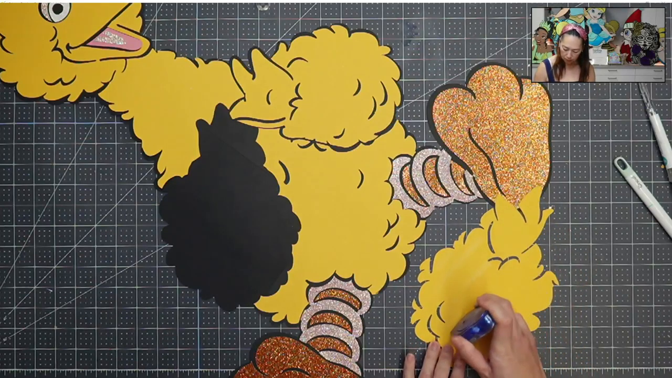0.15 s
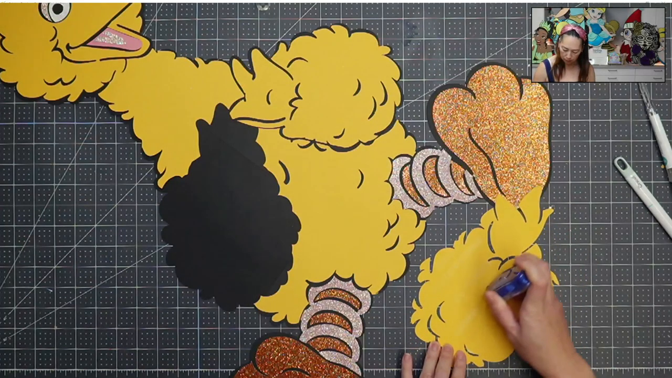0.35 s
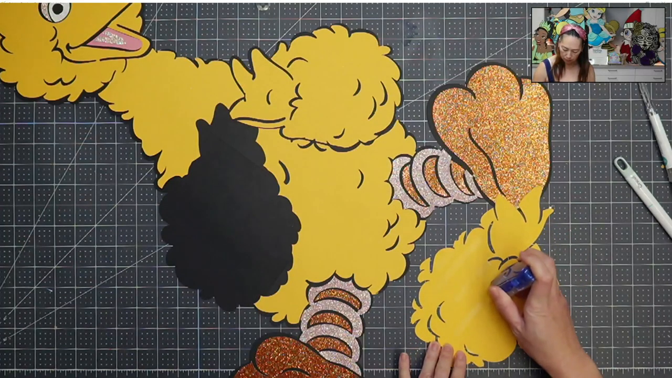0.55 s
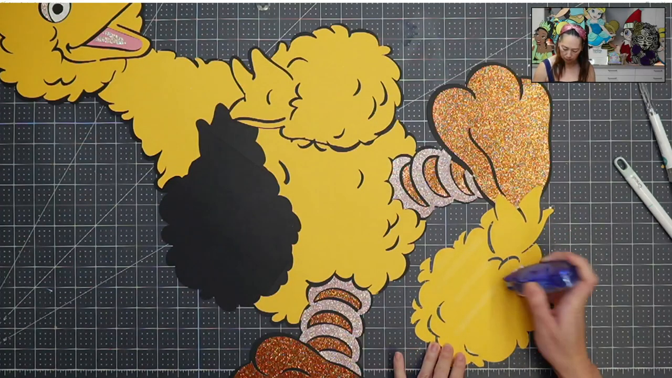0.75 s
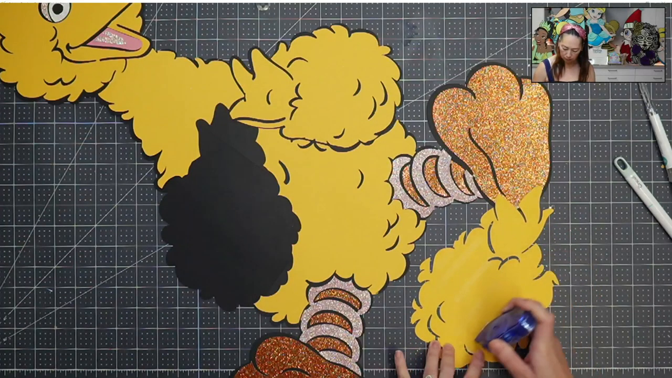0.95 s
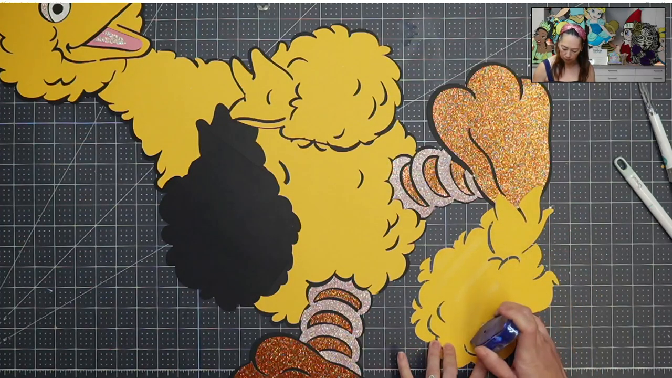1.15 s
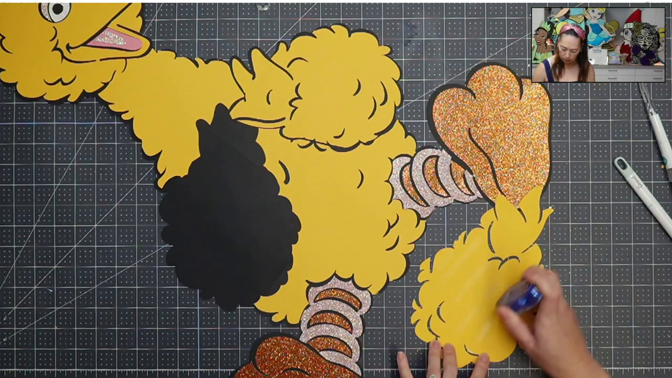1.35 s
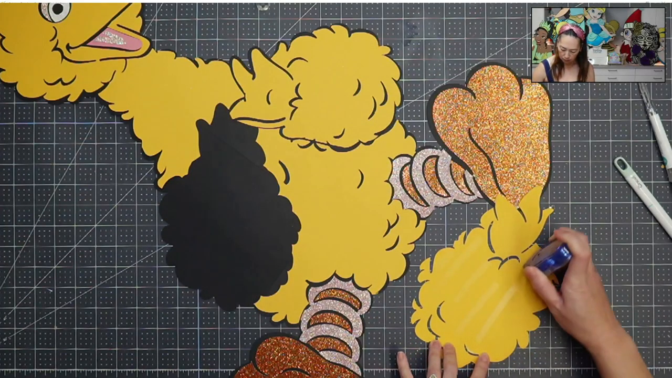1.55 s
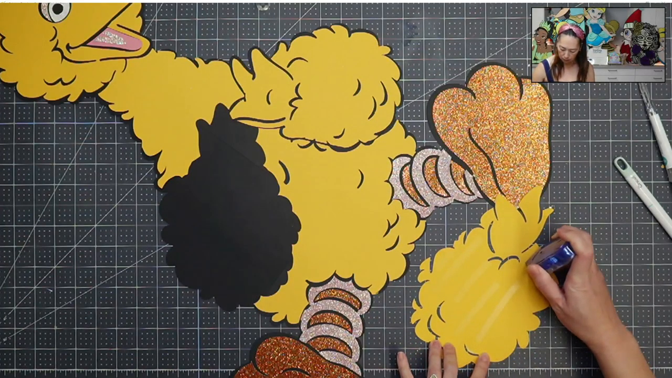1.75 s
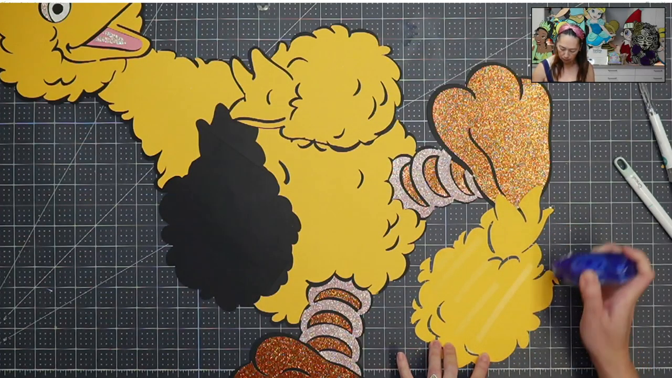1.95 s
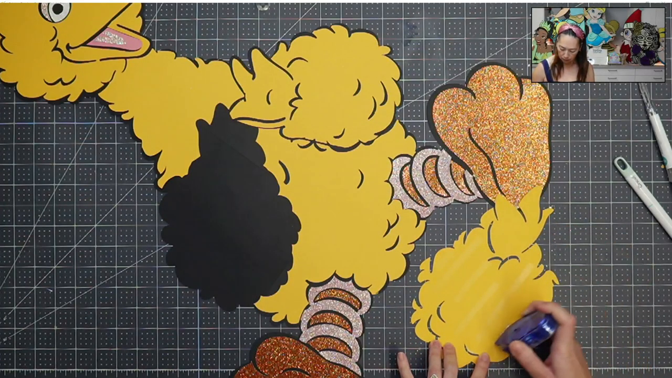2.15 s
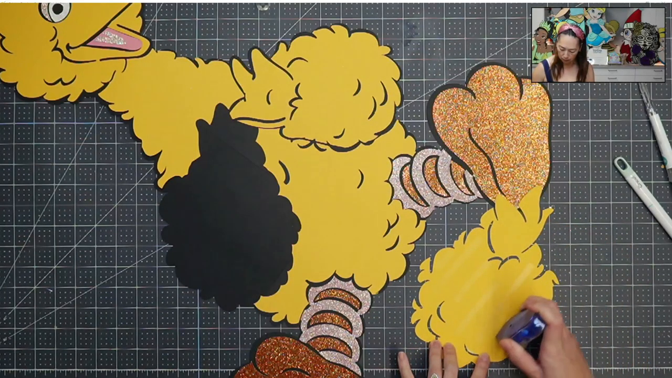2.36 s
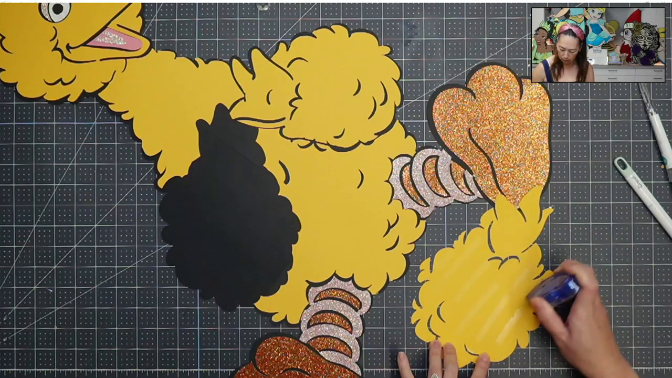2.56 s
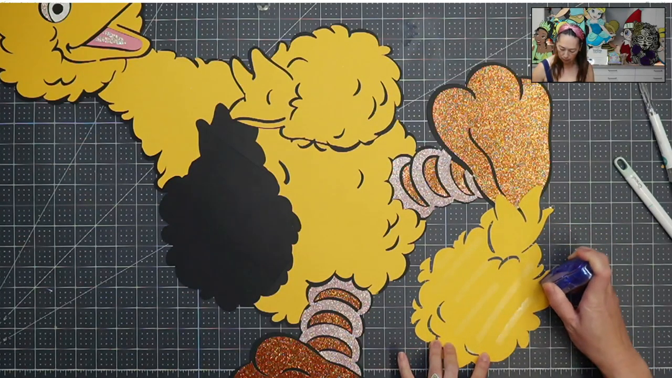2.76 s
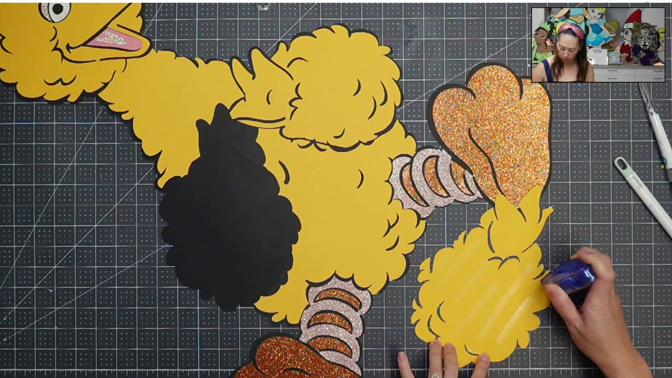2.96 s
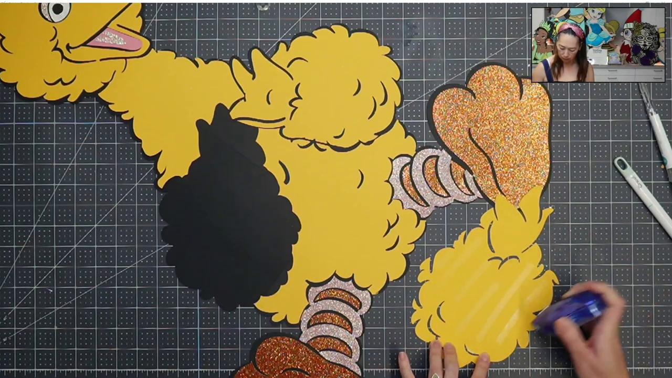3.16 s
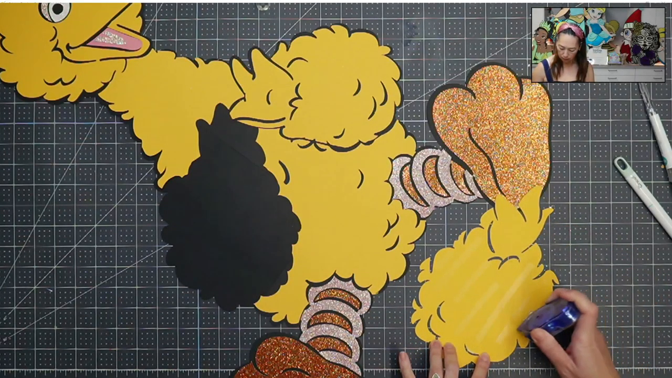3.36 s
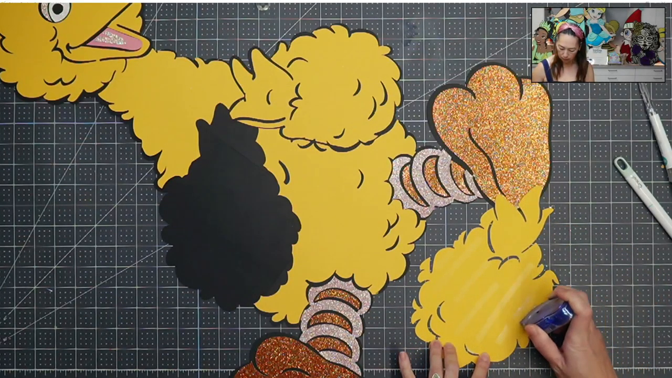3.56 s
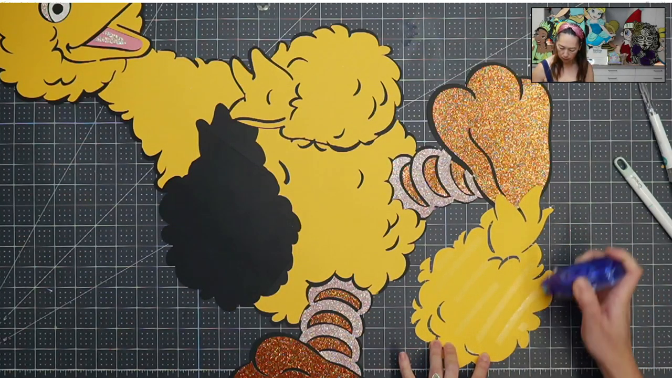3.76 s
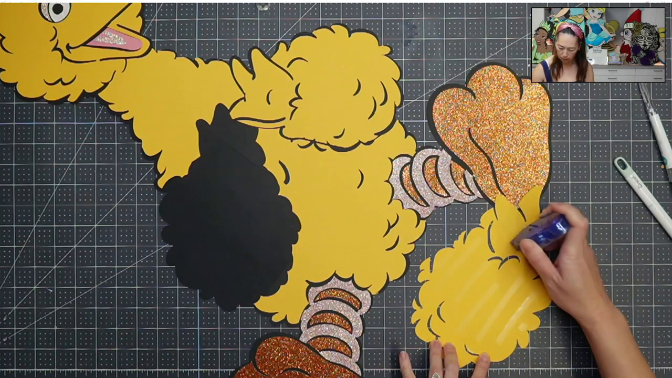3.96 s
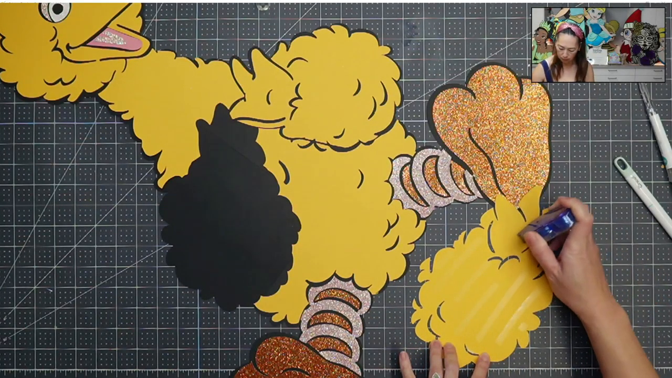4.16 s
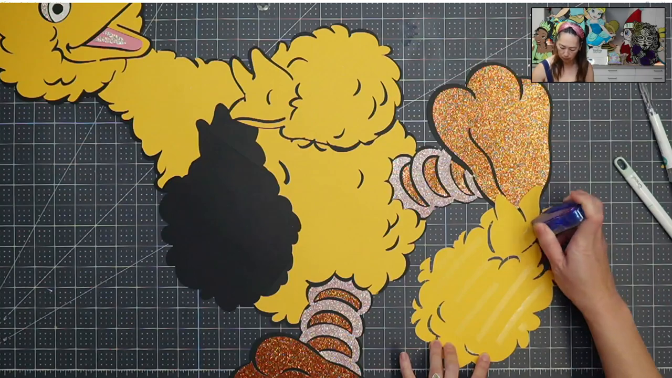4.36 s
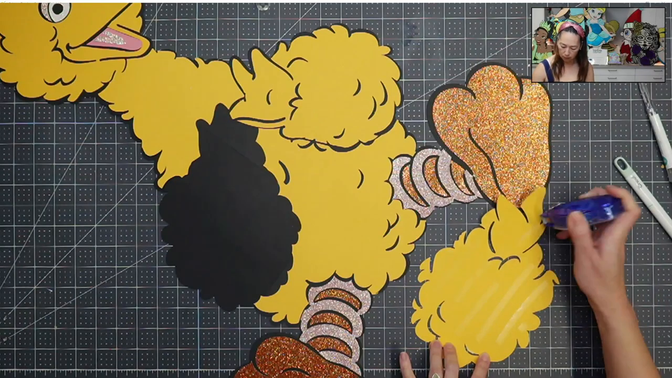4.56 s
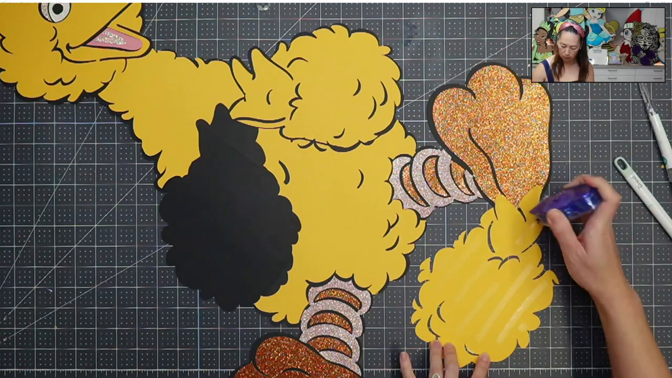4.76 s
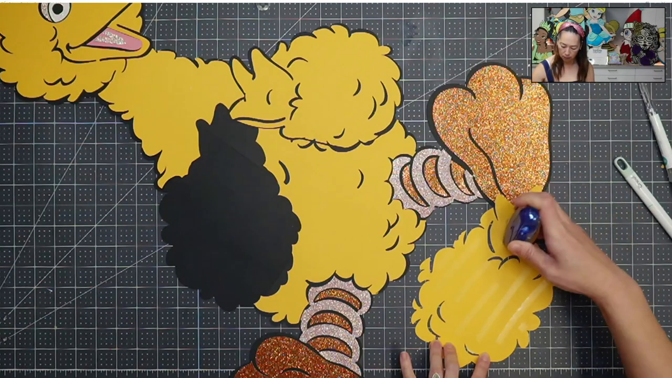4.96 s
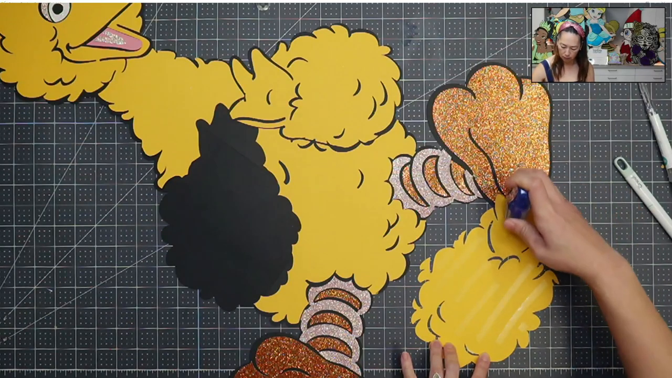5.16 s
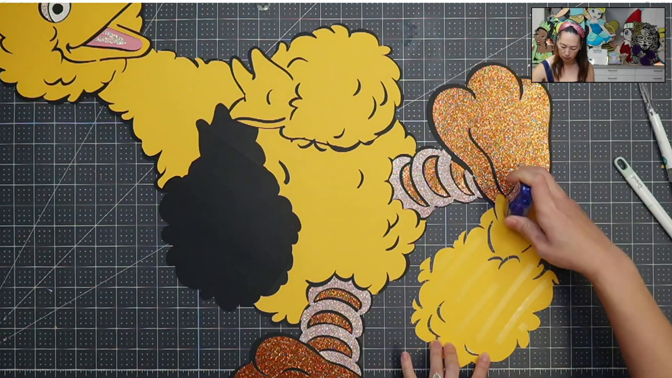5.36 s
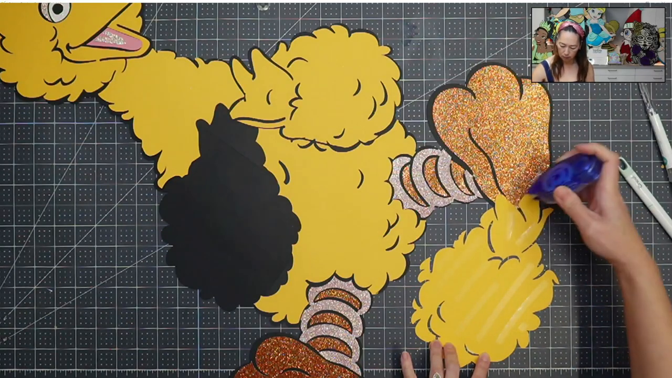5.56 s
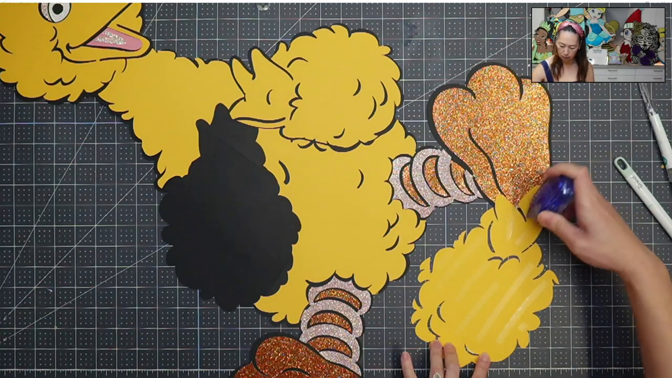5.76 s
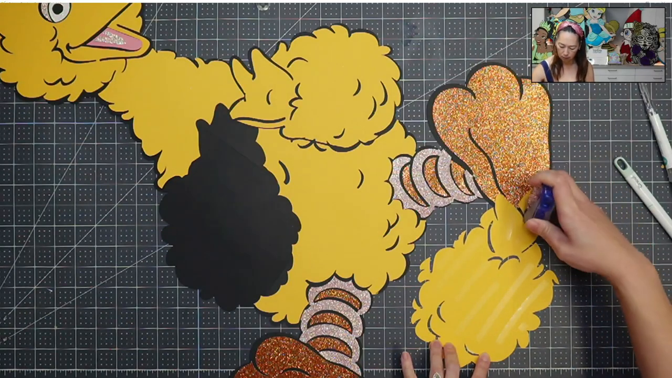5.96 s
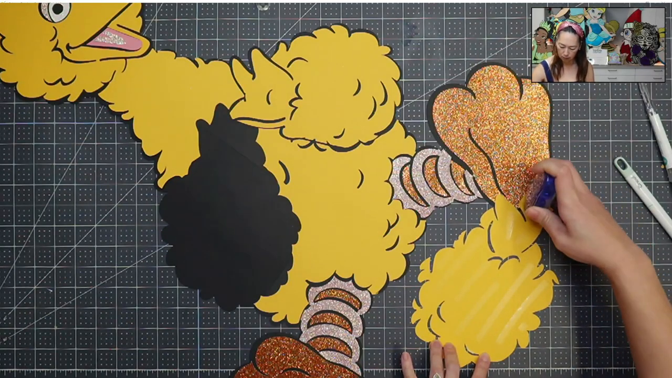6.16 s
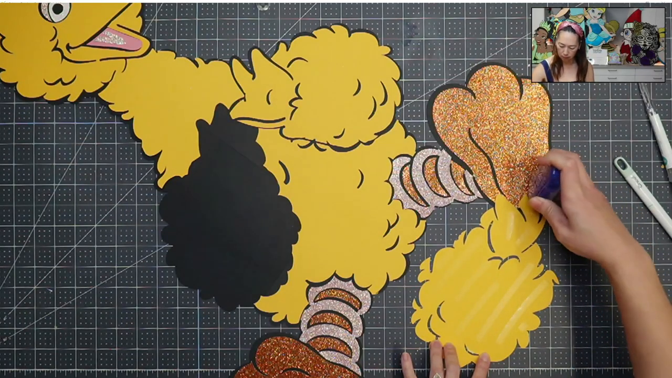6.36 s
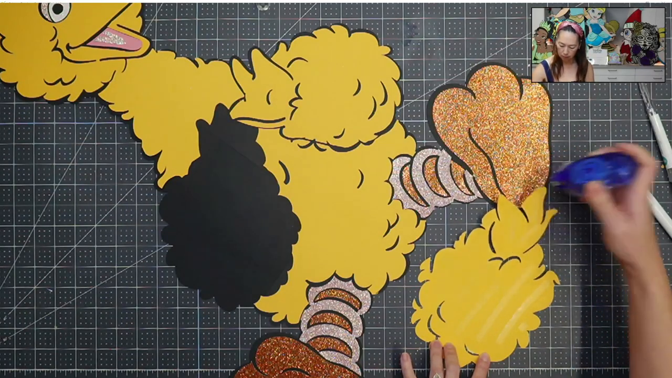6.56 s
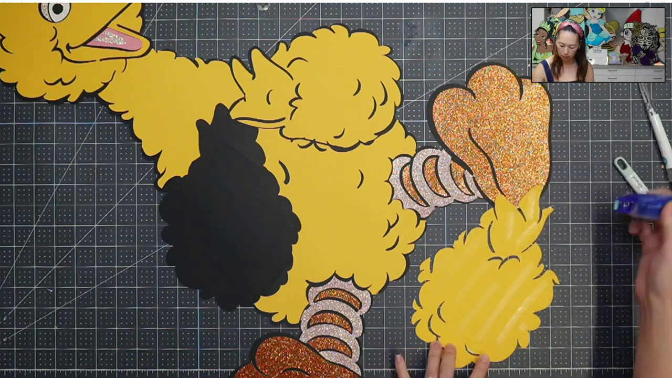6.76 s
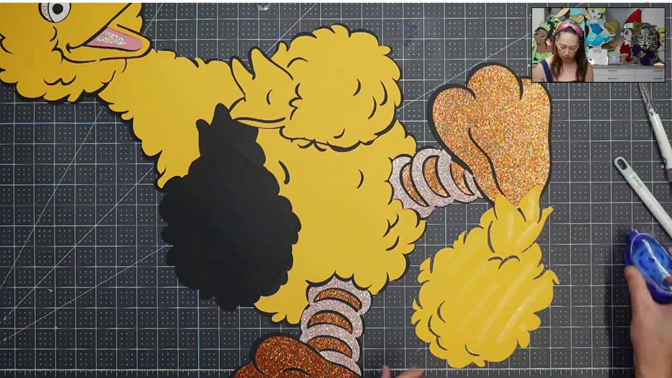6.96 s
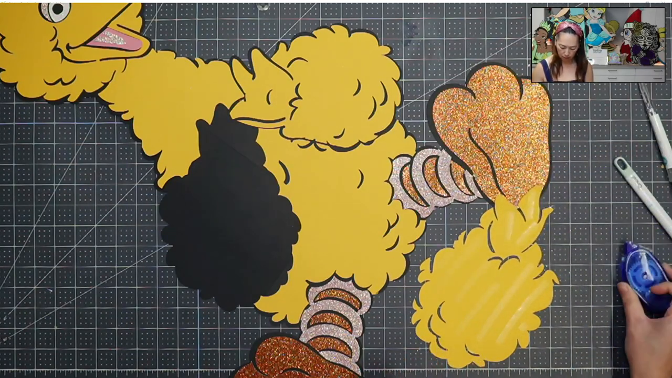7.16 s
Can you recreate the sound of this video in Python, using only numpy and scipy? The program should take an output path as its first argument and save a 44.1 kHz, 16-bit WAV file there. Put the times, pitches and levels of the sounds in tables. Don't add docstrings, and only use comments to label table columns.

```python
import sys
import numpy as np
from scipy import signal
from scipy.io import wavfile
from scipy.ndimage import uniform_filter1d

SR = 44100
rng = np.random.default_rng(int(sys.argv[2]) if len(sys.argv) > 2 else 0)


def to_wav(sig):
    pcm = np.clip(np.atleast_2d(sig), -1, 1) * 32767
    pcm = np.round(pcm).astype(np.int16)
    wavfile.write(sys.argv[1], SR, pcm.T)


def boost(x):
    u = np.asarray(x, float) / 20
    return 10 ** u


N = 318402


def evened(x):
    return x / np.sqrt(np.mean(x ** 2, axis=-1, keepdims=True) + 1e-20)


def read(points, hz):
    f, value = np.transpose(points)
    return np.interp(np.log(hz + 1), np.log(f + 1), value)


def add(mix, s, sound):
    part = mix[max(round(s * SR), 0):][:len(sound)]
    part += sound[:len(part)]


# (frequency [Hz], level [dB per Hz])
AIR = [(12, -44), (22, -10.5), (45, -9), (70, -3.5), (134, -9.5), (250, -18.5), (328, -16.5), (410, -20.5),
       (574, -21.5), (1150, -26.5), (1480, -27.5), (2320, -30), (3250, -30.5), (4670, -34), (16000, -34.5)]
# (frequency [Hz], likeness [0-1])
AIR_LIKENESS = [(60, 0.96), (180, 0.95), (550, 0.75), (1650, 0.74), (4970, 0.4), (7600, 0.057),
                (8100, 0.98), (15000, 0.95)]
# (frequency [Hz], width [Hz], level [dB])
FAN = (3230, 130, -87.5)


def air(air_db=-64.5):
    frames = N // 512 + 5
    hz = np.fft.rfftfreq(2048, 1 / SR)
    a, b, c, d = rng.standard_normal((frames, 1025, 4)).T
    centre = a + 1j * b
    likeness = np.clip(read(AIR_LIKENESS, hz), 0, 1)
    side = np.sqrt((1 - likeness) / 2)[:, None] * (c + 1j * d)
    hiss = np.array([centre + side, centre - side]) * boost(read(AIR, hz))[:, None]
    fan_hz, fan_width, fan_db = FAN
    whine = centre * np.exp(-((hz - fan_hz) / fan_width) ** 2)[:, None]
    hiss = signal.istft(hiss, nperseg=2048, noverlap=1536)[1][..., :N]
    whine = signal.istft(whine, nperseg=2048, noverlap=1536)[1][..., :N]
    return boost(air_db) * evened(hiss) + boost(fan_db) * evened(whine)


def ring(modes, stretch, size=1024):
    t = np.arange(size) / SR
    rung = 0
    for k, (hz, width, db) in enumerate(modes):
        decay = boost(db) * width * np.exp(-np.pi * width * t)
        rung = rung + (-1) ** k * decay * np.sin(2 * np.pi * hz * np.outer(stretch, t))
    lowest_hz = modes[0][0]
    return signal.sosfilt(signal.butter(2, 0.77 * lowest_hz, "high", fs=SR, output="sos"), rung)


def snaps(rows, parts, chatter_s, sag_db, fall_s, grit_db, strike, gain_db, alike, size=400):
    s, snap_db, *others_db = np.transpose(rows)
    t = np.arange(size) / SR
    fall = np.exp(-np.maximum(t - chatter_s, 0) / fall_s)
    shape = np.minimum(t / 0.000055, 1) * boost(-sag_db * t / chatter_s) * fall
    noise, grit = rng.standard_normal((len(s), size, 2)).T
    chatter = signal.lfilter([1], [1, -alike], noise * boost(grit_db * grit)).T * shape
    when, force, grip = rng.random((len(s), 3)).T
    blow_s = .0002 + when[:, None] ** 3 * chatter_s
    chatter += strike * force[:, None] * np.exp(-((t - blow_s) / .00004) ** 2)
    stretch = 1 + 0.06 * (grip - .5)
    sound = 0
    for modes, db in zip(parts, (0, *others_db)):
        rung = signal.fftconvolve(chatter, ring(modes, stretch), axes=1)
        loudest = uniform_filter1d(rung ** 2, size=110, axis=1).max(1)
        sound = sound + rung * (boost(snap_db + db + gain_db) / np.sqrt(loudest))[:, None]
    out = np.zeros(N)
    for start, one in zip(s, sound):
        add(out, start, one)
    return out


USUAL_DB = -37


def voiced(rows, kind, growth=1):
    s, db, lean = np.transpose(rows)[..., None]
    colour_db, slope = np.transpose(kind)
    parts = USUAL_DB + np.multiply(growth, db - USUAL_DB) + colour_db + slope * lean
    snap = parts[:, :1]
    return np.hstack([s, snap, parts[:, 1:] - snap])


# (level [dB], slope [dB per dB of lean])
TOOTH = [(-0.4, 0.2), (-5, .95), (0, 0.01), (-2.5, 0.1), (-33, 0.23)]
GROWTH = [1, 0.47, 0.54, 0.083, 0.55]


def tooth_rows(rows):
    return voiced(rows, TOOTH, GROWTH)


# (time [s], teeth passed [count])
WHEEL = [
    [(0.0028, 0), (0.0222, 3), (0.0666, 11), (0.1051, 17), (0.1697, 25), (0.207, 28), (0.2253, 30),
     (0.2378, 31)],
    [(1.0311, 0), (1.0439, 1), (1.0848, 6), (1.1426, 15), (1.1912, 24), (1.2506, 34), (1.3026, 41),
     (1.3207, 43), (1.3705, 47)],
    [(2.1481, 0), (2.1635, 1), (2.1946, 4), (2.2377, 9), (2.2693, 13), (2.3433, 24), (2.4038, 31),
     (2.4653, 36), (2.4997, 38)],
    [(4.8815, 0), (4.8991, 1), (4.9106, 2), (4.9671, 8), (5.0125, 13), (5.0271, 14)],
]
# (time [s], force [dB], pressure on the card [dB])
STROKES = [
    [(.003, -36, 2.5), (.022, -38, 2.5), (.067, -32.5, 1.5), (.088, -40, 6), (.108, -29, 7),
     (.125, -33.5, -0.5), (.15, -37, 7), (.2, -37.5, 1), (.238, -40.5, 0.5)],
    [(1.031, -38.5, -3.5), (1.06, -36.5, 1), (1.085, -36, 7), (1.143, -31.5, 0.5), (1.19, -36, 5),
     (1.25, -33.5, 1), (1.32, -31, 4.5), (1.37, -31, -2.5)],
    [(2.148, -37, -3.5), (2.195, -39, 4.5), (2.238, -36.5, -1), (2.27, -35, -1), (2.343, -31, 0.5),
     (2.404, -35, -1.5), (2.5, -41.5, 4.5)],
    [(4.882, -40.5, -5.5), (4.911, -38, 0.5), (4.967, -38, 1.5), (5.013, -31.5, -2), (5.027, -34, 2)],
]


def wheel(turning, pull, uneven_s=.0003, uneven_db=2.0, drift_db=1.0):
    turn_s, teeth = np.transpose(turning)
    at = np.interp(np.arange(teeth[-1] + 1), teeth, turn_s)
    s, *levels = np.transpose(tooth_rows(pull))
    rows = np.transpose([at] + [np.interp(at, s, level) for level in levels])
    drift = 2 * uniform_filter1d(rng.standard_normal(rows.shape), size=4, axis=0)
    drift *= [0, 0] + [drift_db] * (len(levels) - 1)
    uneven = rng.standard_normal(rows.shape) * ([uneven_s] + [uneven_db] * len(levels))
    return rows + drift + uneven


# (time [s], force [dB], pressure on the card [dB])
LAST_TEETH = [
    (.2571, -38.5, 5.5),
    (.4082, -40, -1.5),
    (1.172, -23, -27),
    (1.3982, -51, 3),
    (1.5429, -41, -1),
    (2.5474, -37.5, -1),
    (2.6365, -38.5, -3.5),
    (2.6989, -38.5, -7.5),
    (5.9738, -35.5, -4),
]
# (time [s], force [dB], pressure on the card
# [dB])
SLOWER_PULLS = [(3.3057, -32.5, -2.5), (3.3166, -34, 4.5), (3.327, -32, -5), (3.3474, -37, 1),
                (5.8076, -35.5, -9.5), (5.8248, -33, -0.5), (5.838, -36, 0.5), (5.8478, -34, 1),
                (5.8561, -38, 3.5), (5.8745, -35, -2), (6.0168, -29, 6), (6.0246, -36, 7), (6.0301, -27, -3),
                (6.0371, -30, -4), (6.0431, -35, 8), (6.059, -45, 2), (6.0741, -32, -20), (6.1021, -39, -3),
                (3.9231, -35, 1), (3.9374, -36, 4.5), (3.9474, -32.5, 0), (3.9571, -31, -18), (3.9716, -39, 3),
             (3.994, -34, -6), (4.0207, -40.5, 7), (4.0479, -28.5, 2), (4.063, -28, -5), (4.078, -33.5, 9),
             (4.096, -37, -10), (4.1176, -34, -6), (4.1472, -35, -4), (4.1803, -38, -6), (4.2078, -35, -5)]
# (frequency [Hz], width [Hz], level [dB])
SNAP = [(2170, 444, -7), (3012, 310, 0), (3265, 132, 4.5), (3610, 350, -1)]
BELLY = [(1062, 720, -13.5), (1322, 149, -4), (1493, 76, 1.5), (1735, 365, -6.5)]
RIM = [(4406, 730, -0.5), (4690, 370, 5.5), (5450, 980, -2.5), (6900, 1320, -4), (8600, 130, -5)]
SIZZLE = [(9870, 2100, -1), (10650, 340, 2.5), (12360, 1200, 3), (14950, 430, 3.5)]
# (frequency [Hz], width [Hz], level [dB])
TABLE_BASS = [(189, 71, 4), (337, 120, -4.5)]


def ratchet():
    strokes = [wheel(turning, pull) for turning, pull in zip(WHEEL, STROKES)]
    teeth = np.vstack(strokes + [tooth_rows(LAST_TEETH + SLOWER_PULLS)])
    return snaps(teeth, [SNAP, BELLY, RIM, SIZZLE, TABLE_BASS], chatter_s=.0026, sag_db=5, fall_s=.0005,
                 grit_db=4.5, strike=10, gain_db=-1.03, alike=0.42)


# (frequency [Hz], t60 [s])
ROOM = [(200, 0.45), (700, 0.26), (1500, 0.52), (3500, 0.48), (7000, 0.49), (14000, 0.33)]
# (frequency [Hz], level [dB])
WET = [(200, 1), (850, -4.5), (1500, -2.5), (2200, -1), (3300, -4.5), (4800, -6.5), (7000, -8.5),
       (14000, -12.5)]
# (time [s], level [dB])
WALLS = [(.0085, -41), (0.0134, -20), (0.0204, -20), (0.027, -31)]


def room(x, spread_db=-45, build_s=0.00067):
    taps = np.zeros((2, SR))
    at = np.arange(150, SR - 10, 10) + rng.integers(0, 10, (2, (SR - 151) // 10))
    np.put_along_axis(taps, at, rng.choice([-1., 1.], at.shape), 1)
    taps *= 1 - np.exp(-np.arange(SR) / SR / build_s)
    hz, t, z = signal.stft(taps, SR, nperseg=256)
    t60 = read(ROOM, hz)[:, None]
    z = z * boost(read(WET, hz)[:, None] - 60 * t / t60) / np.sqrt(t60)
    mid, side = signal.istft(z, SR, nperseg=256)[1] * np.sqrt(6 * np.log(10) * 10 / SR)
    for s, db in WALLS:
        rough = np.convolve(rng.standard_normal(20), [.5, 1, .5])
        add(mid, s, boost(db) * evened(rough) / np.sqrt(22))
    side = boost(spread_db) * side
    tails = np.array([mid + side, mid - side])
    return signal.fftconvolve(x[None], tails, axes=1)[:, :N]


# (frequency [Hz], width [Hz], level [dB])
TABLE = [(490, 400, -9), (740, 385, 0.5), (960, 210, -4)]


def shell_contact(rows):
    return snaps(rows, [SNAP, BELLY, RIM[:-1], SIZZLE, TABLE], chatter_s=.0022, sag_db=5, fall_s=.0022,
                 grit_db=2.5, strike=3.5, gain_db=0.18, alike=0)


# (time [s], level [dB], thinness [dB])
TICKS = [(.4755, -55, 14), (.4798, -47.5, 11), (.4825, -50, 11), (1.6365, -59.5, -4), (2.7627, -52, 15),
         (3.2138, -41.5, -3), (3.2895, -60, -4), (3.298, -66, -2), (4.359, -52.5, -0.5), (4.4045, -58, 0),
         (4.4285, -70, 11), (4.618, -68, 0), (5.2817, -54.5, -1.5), (5.3622, -60.5, 0), (5.4137, -60.5, -5),
         (6.303, -51, 0), (6.399, -59.5, -2), (6.848, -52, 5)]
# (level [dB], slope [dB per dB of thinness])
TICK = [(-3, -0.99), (-18, -.6), (-1, 0.048), (-8, 0.59), (-22, -0.35)]


def tape_ticks():
    return shell_contact(voiced(TICKS, TICK))


# (time
# [s], level [dB], weight on the table [dB])
CREAKS = [(.515, -55, 1), (.8865, -55, -10), (1.0065, -60, 5), (1.025, -59, 9), (2.138, -56.5, 10),
          (2.768, -59, 2), (2.779, -59, 8), (3.172, -65, 0), (3.2978, -49, 5), (3.9115, -59, 0),
          (4.3165, -56, -8), (4.656, -72, 16), (4.7662, -50, 5.5), (4.7975, -59.5, 15.5), (5.4, -62, 0),
          (6.221, -45.5, 4.5), (6.242, -68, 7), (6.2985, -49.5, 9.5), (6.3136, -49.5, -1),
          (6.489, -64.5, 3), (6.563, -64.5, -6), (6.631, -57.5, -2), (6.8125, -61, 3), (6.8255, -38, 2.5),
          (6.8415, -49, 9), (6.8445, -47, -9), (7.1347, -60.5, 3)]
# (level [dB], slope [dB per dB of weight])
CREAK = [(1.2, -0.16), (-6.5, 0.94), (-10.5, 0.29), (-25, .05), (-21, 0.99)]


def creaks():
    return shell_contact(voiced(CREAKS, CREAK))


# (time [s], level [dB], frequency [Hz], t60 [s])
THUMPS = [
    (0.863, -46.5, 180.4, 0.063),
    (2.016, -48, 187, 0.07),
    (3.209, -41.5, 191.5, 0.06),
    (3.823, -42, 182, 0.032),
    (5.691, -40, 203.5, 0.025),
    (6.823, -60, 200, 0.072),
    (6.971, -53, 201, 0.045),
]


def thumps():
    out, t = np.zeros(N), np.arange(8000) / SR
    for s, db, hz, t60 in THUMPS:
        phase = 2 * np.pi * hz * t
        modes = np.sin(phase) + .3 * np.sin(1.8 * phase) + .4 * np.sin(.6 * phase)
        add(out, s, boost(db + 5.0 - 60 * t / t60) * (1 - np.exp(-t / 0.0048)) * modes)
    return out


# (time [s], click lag [s], touch level [dB], click level [dB], dullness [dB])
LANDINGS = [
    (0.865, 0.0064, -53, -50.5, -5.5),
    (2.0209, 0.0057, -45, -49, -1.5),
    (3.2097, 0.0061, -51, -38.5, 4.5),
    (3.826, .0058, -51, -44.5, 1.5),
    (5.694, 0.0078, -56, -42.5, 13.5),
]
# (level [dB], slope [dB per dB of lean])
TOUCH = [(-2.5, 0), (-2.5, 0), (-13, 0), (-24, 0), (-17.5, 0)]
# (level [dB], slope [dB per dB of dullness])
CLICK = [(1.1, 0), (-16, 0.55), (1.5, -0.42), (2.5, -0.67), (-26, .5)]


def landings(rebound_s=.007, rebound_db=-53.5):
    s, lag, touch_db, click_db, dull = np.transpose(LANDINGS)
    flat = np.zeros(len(s))
    touch = voiced(np.c_[s, touch_db, flat], TOUCH)
    click = voiced(np.c_[s + lag, click_db, dull], CLICK)
    rebound = voiced(np.c_[s + lag + rebound_s, flat + rebound_db, flat - 7], CREAK)
    return shell_contact(np.vstack([touch, click, rebound]))


# (time [s], level [dB], frequency [Hz], t60 [s])
RINGS = [(3.212, -40, 1095, 0.031), (3.348, -28, 4900, 0.029), (4.656, -53, 850, 0.02),
         (4.882, -30.5, 6900, 0.019), (4.955, -43, 902, 0.039), (4.987, -38, 4850, .02),
         (5.004, -31, 5100, 0.017), (5.013, -41, 4670, 0.028), (6.826, -47, 677, 0.029),
         (6.843, -44, 7560, 0.033), (1.244, -35, 4680, .03), (6.972, -34, 4150, 0.027),
         (6.972, -42.5, 660, 0.029)]


def rings():
    out, t = np.zeros(N), np.arange(4000) / SR
    for s, db, hz, t60 in RINGS:
        add(out, s, boost(db - 60 * t / t60) * (1 - np.exp(-t / .0005)) * np.sin(2 * np.pi * hz * t))
    return out


# (time [s], level [dB], weight on the table [dB])
SETDOWN = [
    (6.9104, -68, 4),
    (6.9565, -42, -6.5),
    (6.972, -37, 4.5),
    (6.9775, -50, -7),
]
# (level [dB], slope [dB per dB of weight])
KNOCK = [(0.8, 0.42), (-5.5, 1), (-1.5, 0.29), (-21, -1), (-12, 0.38)]


def setdown():
    return shell_contact(voiced(SETDOWN, KNOCK))


def scene():
    direct = ratchet() + tape_ticks() + creaks() + thumps() + landings() + rings() + setdown()
    return direct + room(direct) + air()


def roll_off(x):
    return signal.sosfilt(signal.butter(12, 16810, fs=SR, output="sos"), x)


def record(dry):
    lowpass = signal.firwin(511, 15750, window=("kaiser", 7), fs=SR)
    limited = signal.oaconvolve(dry, lowpass[None], "same")
    return roll_off(limited)


dry = scene()
out = record(dry)
to_wav(out)
```